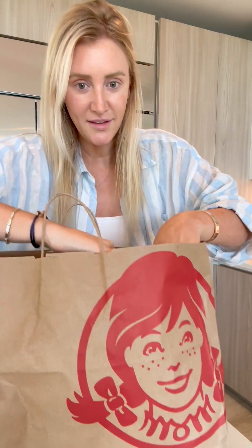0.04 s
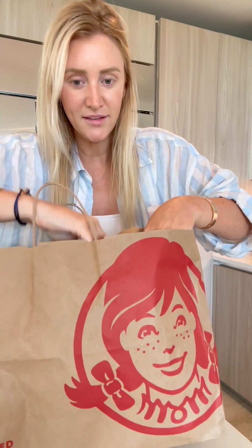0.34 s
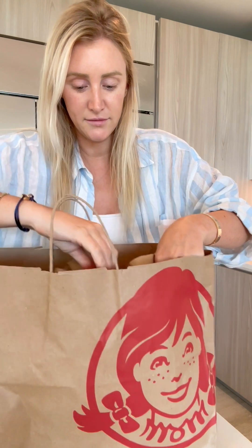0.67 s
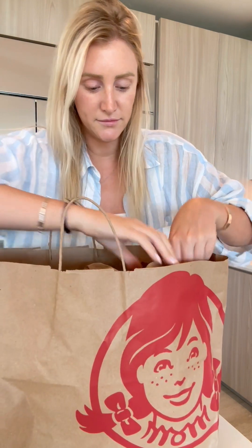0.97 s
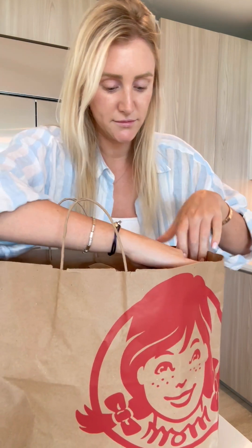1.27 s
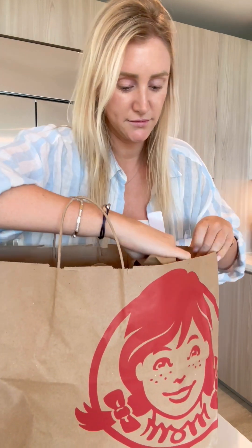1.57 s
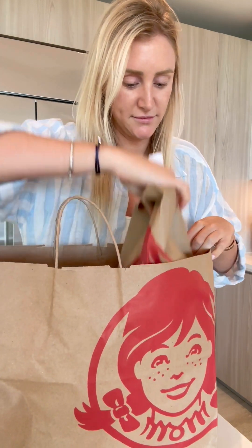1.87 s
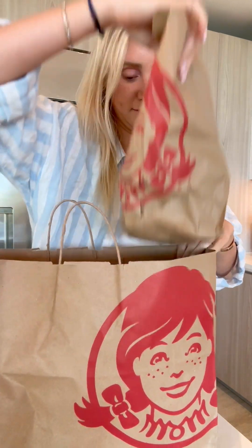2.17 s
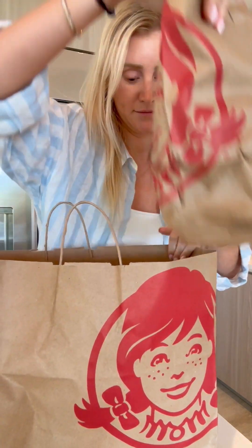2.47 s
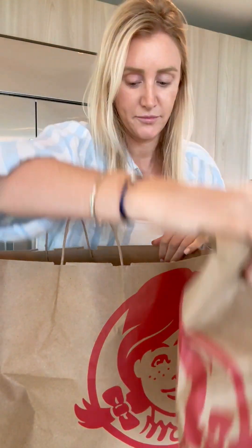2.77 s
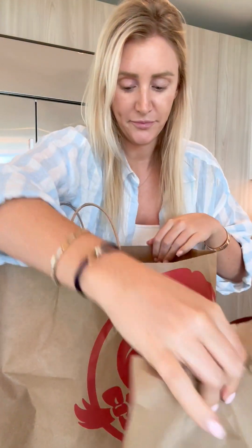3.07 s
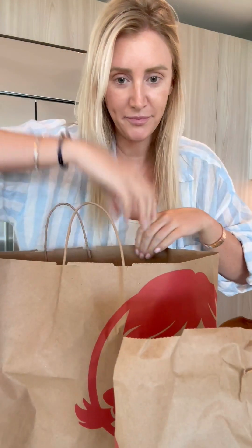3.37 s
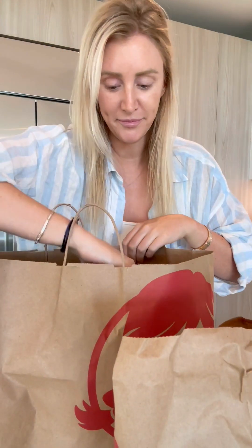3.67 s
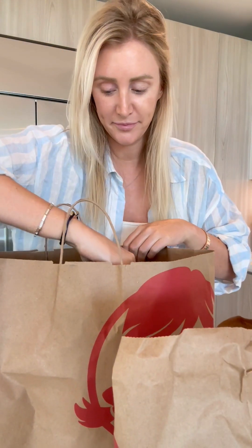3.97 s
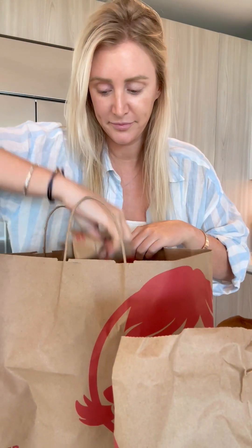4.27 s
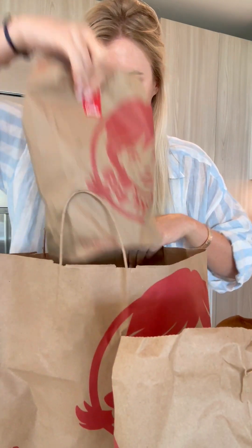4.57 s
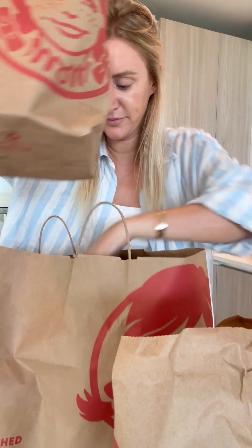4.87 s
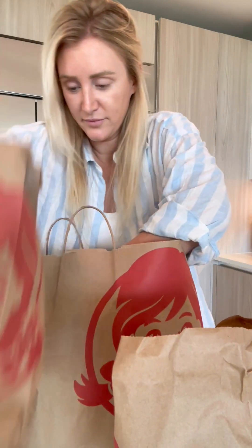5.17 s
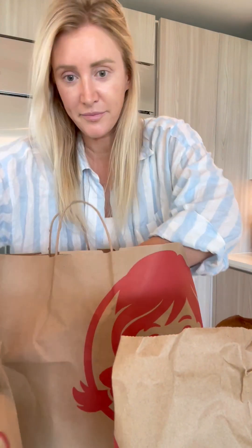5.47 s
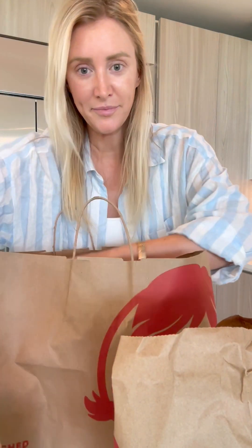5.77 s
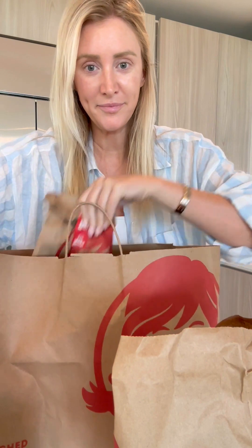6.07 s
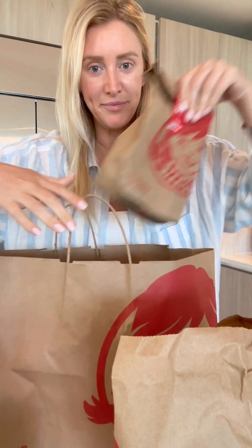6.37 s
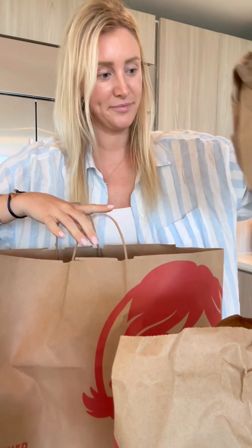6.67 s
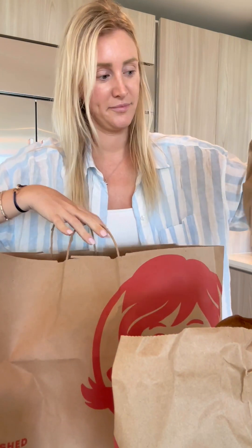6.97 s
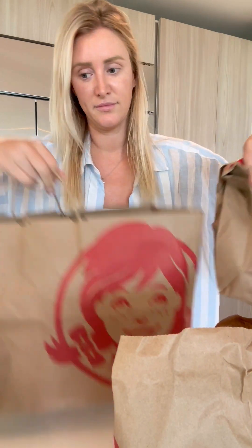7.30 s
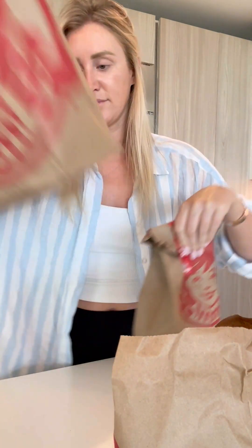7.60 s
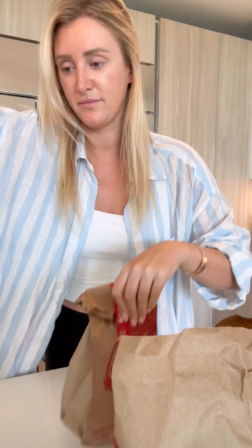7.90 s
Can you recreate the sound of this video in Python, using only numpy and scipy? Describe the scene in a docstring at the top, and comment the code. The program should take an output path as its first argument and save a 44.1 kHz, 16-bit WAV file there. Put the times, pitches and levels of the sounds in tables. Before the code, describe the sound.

Close, crisp paper rustling starts at once as hands rummage in a large paper bag, with sharp crease snaps and hollow pops from its stiff sides. The crinkling grows thicker from about 1.3 to 2.2 seconds, then loosens into separate crackles. A full bag lands on the counter with a soft thump near 2.9 seconds, amid more crunching. After a brief lull, rummaging resumes at 3.6 seconds, and the panels pop and flap from about 4 to 5 seconds. Dull thuds come near 5.1 and 5.5 seconds, followed by more crinkling and sharp snaps at 6 and 6.3 seconds. The paper quietens, then gives a cluster of hollow flaps and soft bumps around 7 seconds as the large bag is moved aside. Faint rustles and one small crackle near 8 seconds finish. A low ventilation hum and the short reflections of a small kitchen lie underneath.

```python
"""A small kitchen: hands rummage in a large paper carrier bag on the counter, lift out three small bags
and put the carrier aside. Paper sliding on paper hisses and crinkles, creases snap, stiff panels buckle
with hollow pops or slow flaps, and full bags thump down. The walls answer over a low ventilation hum,
and the paper is heard from nearby, with a wide stereo treble."""
import sys
import numpy as np
from scipy import signal
from scipy.fft import rfft, irfft, next_fast_len
from scipy.io import wavfile
from scipy.ndimage import uniform_filter1d, map_coordinates

SR = 44100
rng = np.random.default_rng(int(sys.argv[2]) if len(sys.argv) > 2 else 0)


def waveform_to_disk(signal):
    """Save audio, clipped to [-1, 1], as 16-bit WAV at the path in sys.argv[1]."""
    frames = np.transpose(np.atleast_2d(signal))
    scaled = np.clip(frames, -1, 1) * 32767
    samples = np.round(scaled).astype(np.int16)
    wavfile.write(sys.argv[1], SR, samples)


N = 358974
SCATTER_DB = 6.5  # level spread of the lesser snaps and pops, either way


def handling():
    """How hard the hands work the paper: dB curves that drive panel flutter, crinkle and hiss."""
    # strokes of paper on paper, with flutter and hiss relative to the crinkle:
    # start_s, length_s, crinkle_db, swell_db, flutter_db, hiss_db
    strokes = [ (-0.02, 0.063, -33.5, 1, 2, -7.5), (0.089, 0.31, -39.5, -14, 0, -8),
               (0.314, 0.058, -31, 5, -2.5, -4), (0.365, 0.038, -26.5, 1.5, -2.5, -7),
               (0.499, 0.32, -35, -2, 2, -8), (0.885, 0.12, -47.5, 2.5, -1.5, -3),
               (1.028, 0.1, -45, 1, -1, -2), (1.123, 0.25, -41, -2, 0.5, -7),
               (1.309, 0.24, -33.5, 5.5, 0, -8.5), (1.595, 0.22, -32.5, 10, -3.5, -5),
               (1.8, 0.18, -30.5, 4, -1.5, -2.5), (1.937, 0.16, -29.5, 1, -3.5, -3),
               (2.118, 0.048, -32.5, 2, 3.5, -9.5), (2.24, 0.36, -50, -16.5, 2, -8.5),
               (2.486, 0.055, -48, -5, 7, -11.5), (2.603, 0.14, -48, -10.5, -1, -24),
               (2.906, 0.046, -34.5, 1, 1.5, -7.5), (2.964, 0.055, -35, 6.5, 0, -9),
               (3.057, 0.096, -31.5, -4, -1.5, -6.5), (3.226, 0.16, -58, 3.5, -6, -8),
               (3.602, 0.23, -41, -6, -1, -5), (3.865, 0.4, -39.5, 1, 1, -5.5),
               (4.35, 0.33, -44, -0.5, -5, 1), (4.44, 0.012, -34.5, 3, 1.5, -1),
               (4.637, 0.22, -44, -5.5, 5, -9.5), (4.92, 0.14, -48.5, 4.5, 10, -13.5),
               (5.075, 0.34, -46.5, 5.5, 2.5, -9), (5.451, 0.26, -41, -11, 1, -9.5),
               (5.673, 0.07, -37, 10, -2, -7.5), (5.803, 0.14, -45.5, -5.5, 2, -5.5),
               (5.983, 0.045, -47, -6, 7, 1.5), (6.12, 0.19, -48, 1, -0.5, -0.5),
               (6.4, 0.23, -64, -15, -1, -12), (6.573, 0.19, -65.5, -1.5, -3, -4.5),
               (6.958, 0.1, -49.5, -7, 11.5, -20.5), (7.06, 0.15, -52.5, 11, 3.5, -11.5),
               (7.28, 0.23, -56, -18, -4, -40), (7.475, 0.11, -59.5, 4, 3.5, -7.5),
               (7.798, 0.13, -66, 3.5, 1, -13), (7.981, 0.012, -43, 1.5, 2, -10.5),
               (8.1, 0.05, -57.5, 3, 8, -5.5)]
    # paper barely stirring between strokes: flutter_db, crinkle_db, hiss_db
    rest_db = [-62.5, -70.5, -88]
    attack_s, release_t60_s = 0.021, 0.33  # a stroke takes hold quickly; the paper settles after it
    power = np.zeros((3, N))
    for start, length, crinkle_db, swell_db, flutter_db, hiss_db in strokes:
        span = np.arange(max(0, int(start * SR)), min(N, int((start + length + release_t60_s) * SR)))
        t = span / SR - start
        hold = amp(crinkle_db + swell_db * (np.minimum(t / length, 1) - .5))
        release = amp(-60 * np.maximum(t - length, 0) / release_t60_s)
        envelope = np.clip(t / attack_s, 0, 1) * hold * release
        power[:, span] += (amp([[flutter_db], [0], [hiss_db]]) * envelope) ** 2
    return 10 * np.log10(power + amp(rest_db)[:, None] ** 2)


def rustle(levels):
    """Paper slides on paper: the same slips make panels flutter, wrinkles crinkle and fibres hiss."""
    # boxy tone of the panels: freq_hz, gain_db
    panel_eq = [(25, -33.5), (60, 10), (130, 4.5), (215, 2.5), (285, 4.5), (370, -1), (600, 1), (1000, -3),
                (1500, -6), (2200, -20.5), (4000, -76)]
    # midrange bite of the wrinkles: freq_hz, gain_db
    crinkle_eq = [(300, -43), (900, 2.5), (1500, 1.5), (2000, 5.5), (2300, 1), (2600, 3), (3100, -1.5),
                  (3800, 0.5), (4700, -9), (5900, -6), (7000, -19), (9000, -34), (15000, -57.5)]
    # airy top of the fibres: freq_hz, gain_db
    hiss_eq = [(2500, -34.5), (5000, 1.5), (7400, 3), (10000, -1.5), (12300, -2), (15500, -1.5)]
    panel_db, crinkle_db, hiss_db = levels
    grip_db = 1.46 * wobble(55)  # the sheets catch and let go
    slips = unit(crackle(per_s=570, spread_db=0, t60_s=.082, smooth=.84))
    ticks = amp(-7.5) * unit(crackle(per_s=130, spread_db=3, t60_s=.012))
    prickles = amp(-3) * unit(crackle(per_s=110, spread_db=3.2, t60_s=.006))
    facets = unit(flutter(per_s=420, pitch_hz=665, scatter=.586, cycles=14.7, spread_db=6.5))
    creases = unit(flutter(per_s=350, pitch_hz=2550, scatter=.482, cycles=13, spread_db=29))
    crunch = slips + ticks + .5 * prickles + .15 * creases
    panels = amp(panel_db + grip_db) * unit(coloured(facets + .81 * slips, panel_eq))
    wrinkles = amp(crinkle_db + grip_db) * unit(coloured(crunch, crinkle_eq))
    fibres = amp(hiss_db + grip_db + 3) * unit(coloured(slips + ticks + prickles, hiss_eq))
    return crumple(panels + wrinkles + fibres, depth_db=2.17)


def crackle(per_s, spread_db, t60_s, smooth=0):
    """Tiny random slips, each a short burst of noise, over a smooth share of sliding."""
    when, strength = rng.random((int(per_s * N / SR), 2)).T
    sizes = amp(spread_db * np.minimum(-np.log(1 - strength), 4))
    slips = np.bincount((when * N).astype(int), sizes ** 2, N)
    decay = amp(-60 / (t60_s * SR)) ** 2
    power = signal.lfilter([1], [1, -decay], slips)
    return np.sqrt(power / power.mean() + smooth) * rng.standard_normal(N)


def flutter(per_s, pitch_hz, scatter, cycles, spread_db, size=900):
    """Many small facets flip over, each ringing for a few cycles at its own pitch."""
    when, strength = np.hsplit(rng.random((int(per_s * N / SR), 2)), 2)
    hz = pitch_hz * np.exp(scatter * rng.standard_normal(when.shape))
    turns = hz * np.arange(size) / SR
    grains = amp(spread_db * strength - 60 * turns / cycles) * np.sqrt(hz) * np.sin(2 * np.pi * turns)
    where = (when * N).astype(int) + np.arange(size)
    return np.bincount(where.ravel(), grains.ravel(), N)[:N]


def crumple(x, depth_db, size=512):
    """The crumpled sheet keeps changing shape, so short-lived resonances come and go."""
    spectrum = signal.stft(x, nperseg=size)[2]
    patches = uniform_filter1d(rng.standard_normal(spectrum.shape), size=3, axis=0)
    patches = uniform_filter1d(patches, size=5, axis=1)
    return signal.istft(spectrum * amp(depth_db * unit(patches)), nperseg=size)[1][:len(x)]


def snaps(levels):
    """Creases snap through, each with its own balance of hollow body, crack and bright edge."""
    # the loudest creases, with body and edge relative to the crack: start_s, level_db, body_db, edge_db
    accents = [(0.032, -30.5, -3, -2.5), (0.098, -36, 5, -13), (0.104, -24.5, -1, -5),
               (0.108, -24, -15, -4.5), (0.114, -32.5, 4, 0), (0.295, -37, -1, -10.5),
               (0.391, -25.5, 2.5, -10), (0.399, -27, 0.5, -12), (0.411, -36, 4, -11.5),
               (0.546, -27.5, -4, -6.5), (0.602, -35.5, -8, -8), (0.715, -28.5, -5, -15),
               (0.753, -29.5, -3, -5), (0.783, -30.5, 1.5, -4.5), (0.789, -32, -1, -3),
               (0.853, -33, -2, -13.5), (0.921, -33.5, -5, -4), (0.964, -32.5, -1.5, -10),
               (0.974, -39, -12, -10), (1.055, -42, 0, -5), (1.067, -41.5, -4, -2), (1.152, -33, -16, -14),
               (1.212, -30, 0.5, -15.5), (1.217, -28, 4, -0.5), (1.24, -30.5, -4, -9),
               (1.284, -33, -8, -11.5), (1.323, -34.5, 2, -4), (1.335, -30.5, 0.5, -5),
               (1.424, -26.5, -5, -8.5), (1.427, -36, 0.5, -10), (1.476, -30.5, 1, -2.5),
               (1.514, -31, -0.5, -11), (1.525, -35, -8, -4.5), (1.544, -38.5, -4, -7),
               (1.636, -38.5, 7.5, -19.5), (1.66, -23.5, -6, -9.5), (1.938, -24, -0.5, -9.5),
               (1.955, -24.5, -2, -3.5), (1.964, -30.5, 2.5, -10.5), (2.01, -26, 2, -14),
               (2.058, -23.5, -20, -10.5), (2.096, -24.5, -11, -7.5), (2.129, -35.5, 4, -14.5),
               (2.175, -29.5, -3, -2), (2.198, -37.5, -6, 1.5), (2.234, -25.5, -4.5, 0),
               (2.28, -30, -2, -2.5), (2.34, -30.5, -6, -26), (2.46, -38.5, -4.5, -11.5),
               (2.48, -47.5, 3, -7), (2.502, -43.5, 6, -13), (2.529, -41.5, 4.5, -2),
               (2.613, -27, -10.5, -10), (2.637, -40, 2.5, -11), (2.675, -24.5, 1, -1),
               (2.677, -27.5, -5, 0.5), (2.71, -38, 1, -13), (2.724, -38.5, 4, -17.5),
               (2.734, -27.5, -3, -7), (2.821, -29.5, -4.5, -15), (2.887, -43, 2, -12),
               (2.916, -38, 3, -14), (2.924, -33, 2.5, -9), (2.931, -26, -9, -8.5), (2.974, -39.5, -6, -15),
               (3.003, -27.5, -1, -10.5), (3.014, -25.5, -4, -10), (3.083, -20.5, -4.5, -9),
               (3.112, -30.5, 0.5, -3.5), (3.135, -26.5, -11, -13.5), (3.156, -24, -7, -1),
               (3.184, -33, -11, -5.5), (3.608, -36, -3.5, -5.5), (3.618, -34, -2, -1.5),
               (3.651, -31.5, -5, -20), (3.723, -34, -5, -4.5), (3.76, -34, -1, -1),
               (3.808, -28.5, -27, -8), (3.815, -29.5, -1.5, -8), (3.889, -31.5, -2, -4),
               (3.909, -34.5, -5.5, -10.5), (3.965, -30, -1.5, 3.5), (4.003, -34, 1, -3),
               (4.011, -37, 0, -11), (4.078, -35.5, 2.5, -21), (4.107, -24.5, 0, -17),
               (4.28, -38, 8.5, -18), (4.348, -39, -4, -0.5), (4.382, -26, -25, -7),
               (4.478, -35, -12, -0.5), (4.602, -24, -6, -5), (4.661, -34, -7, -13), (4.725, -38, 7, -26),
               (4.743, -39, 6, -19.5), (4.803, -49, 11, -17), (4.869, -40.5, -3, -12),
               (4.941, -42.5, 4, -24), (5, -39.5, -14, -3), (5.024, -46, 2, -25), (5.04, -47, 11, -18),
               (5.066, -43.5, 8, -17), (5.117, -45.5, 5, -11), (5.134, -46, -1, -7), (5.173, -36, -2, -21),
               (5.222, -40, 5, -13), (5.311, -30, -1.5, -5.5), (5.318, -35, 1, -7.5), (5.357, -50, 12, 2),
               (5.391, -38.5, 2, -9), (5.457, -35, 0, -0.5), (5.506, -38, -1, -4.5),
               (5.578, -31, -0.5, -9.5), (5.586, -37, 3.5, -3.5), (5.642, -42.5, -10, 0),
               (5.684, -28.5, -3.5, -4.5), (5.692, -26.5, -4, 2), (5.729, -34.5, -8, 4),
               (5.761, -32, -0.5, -10), (5.791, -50, 0, 2.5), (5.817, -32, -4, 0.5),
               (5.822, -30.5, -11, -5.5), (5.853, -33.5, -18, -11.5), (5.934, -44, 1, -6),
               (5.971, -46.5, -7, -13), (6, -25.5, -5.5, -7), (6.03, -44.5, 4, -9), (6.1, -32, -3.5, -1.5),
               (6.14, -43, 7, 2.5), (6.249, -36.5, 5.5, -10), (6.295, -23, -4, -1.5),
               (6.354, -43.5, 1, -2.5), (6.358, -38.5, -3, -3.5), (6.415, -43.5, -7, -20),
               (6.492, -55, 12, -29), (6.591, -42.5, -8, -6.5), (6.759, -55, -16, -1.5),
               (6.972, -40, 1.5, -36), (6.991, -39, 2, -36), (7.022, -36.5, 4, -24),
               (7.182, -42.5, -8, -4.5), (7.199, -32.5, 3.5, -32), (7.297, -44, 16.5, -30),
               (7.699, -54.5, 5.5, -15), (8.008, -40, 1, -19)]
    # hollow body: freq_hz, gain_db
    body_eq = [(150, -18.5), (500, -5), (1000, 3), (1700, 6.5), (2400, -8.5), (5000, -56)]
    # midrange crack: freq_hz, gain_db
    crack_eq = [(700, -29), (1600, 2), (2100, 4.5), (3800, 1.5), (4800, -2), (6000, 0), (7500, -12),
                (11000, -61)]
    # bright edge: freq_hz, gain_db
    edge_eq = [(3500, -45), (6000, 3.5), (7500, 12.5), (10000, 0.5), (12300, -1.5), (15500, 3.5)]
    out, t = np.zeros(N), np.arange(SR // 10) / SR
    lesser = [(start, crinkle - 3.5 + scatter, -1 + SCATTER_DB * draw, hiss - crinkle)
              for start, _, crinkle, hiss, scatter, draw in chance_moments(levels, per_s=12)]
    for start, level_db, body_db, edge_db in accents + lesser:
        burst = snap_burst(t, rise_s=.0012, ring_db=-14, ring_t60_s=.045, ripple_db=2.1)
        tick = snap_burst(t, rise_s=.0009, ring_db=-19, ring_t60_s=.05, ripple_db=2.5)
        body = amp(body_db) * held(coloured(burst, body_eq), .0065)
        crack = held(coloured(burst, crack_eq), .0058)
        edge = amp(edge_db) * held(coloured(tick, edge_eq), .017)
        add(out, start, amp(level_db) * (body + crack + edge))
    return out


def snap_burst(t, rise_s, ring_db, ring_t60_s, ripple_db, count=40):
    """A crease gives way in milliseconds; the sheet shivers on, with resonances set by its folds."""
    envelope = t / rise_s * np.exp(1 - t / rise_s) + amp(ring_db - 60 * t / ring_t60_s)
    folds = np.column_stack([np.geomspace(600, 15000, count), ripple_db * rng.standard_normal(count)])
    return coloured(envelope * rng.standard_normal(len(t)), folds)


def buckles(levels, count=14):
    """A panel pops through and rings in a cluster of modes round its pitch, with a scuff of noise."""
    # the loudest panels buckling or being bumped: start_s, level_db, pitch_hz
    accents = [(0.105, -26, 520), (0.397, -24, 760), (0.544, -34.5, 790), (0.554, -23.5, 683),
               (0.697, -31, 620), (1.424, -34, 584), (1.509, -28.5, 518), (2.165, -30, 597),
               (1.99, -31, 290), (2.175, -29.5, 263), (2.315, -28, 484), (2.734, -31, 630),
               (2.822, -44.5, 480), (3.622, -35.5, 620), (4.107, -23.5, 673), (4.282, -24, 640),
               (4.381, -21, 673), (4.384, -27.5, 274), (4.664, -30, 402), (4.725, -24.5, 897),
               (4.741, -30, 834), (4.873, -29.5, 474), (4.954, -31.5, 713), (4.987, -31, 520),
               (5.025, -28.5, 505), (5.24, -30.5, 480), (5.476, -27, 530), (5.816, -30.5, 484),
               (5.847, -30.5, 442), (6.001, -41, 626), (6.028, -31.5, 423), (6.255, -40, 735),
               (6.297, -41, 684), (6.362, -34.5, 406), (7.023, -28, 600), (7.031, -29, 553),
               (7.147, -37, 635), (7.199, -25, 570), (7.213, -33.5, 600), (7.298, -28.5, 680),
               (7.305, -25.5, 600), (7.512, -42.5, 544), (8.012, -37, 514)]
    typical_hz, spread_octaves, ring_cycles = 600, .39, 26
    out, t = np.zeros(N), np.arange(SR // 6) / SR
    lesser = [(start, panel - 7.5 + scatter, typical_hz * 2 ** (spread_octaves * draw))
              for start, panel, _, _, scatter, draw in chance_moments(levels, per_s=5)]
    for start, level_db, hz in accents + lesser:
        modes_hz = hz * np.exp(np.linspace(-.8, .85, count) + .078 * rng.standard_normal(count))
        lag_cycles = rng.uniform(0, 2.305, (count, 1))  # slow, low bending waves tend to arrive last
        turns = np.maximum(modes_hz[:, None] * t - lag_cycles, 0)
        strength = np.hanning(count + 2)[1:-1] * rng.choice([-1, 1], count)
        ring = strength @ (np.sin(2 * np.pi * turns) * amp(-60 * turns / ring_cycles))
        push = (1 - np.exp(-t / .00095)) * amp(-60 * t / .058) * rng.standard_normal(len(t))
        scuff = coloured(push, [(hz / 7, -16), (hz / 2.1, -2), (hz * .85, -1),
                                (hz * 4.3, -7), (hz * 6, -22), (hz * 16, -48)])
        add(out, start, amp(level_db) * (held(ring, .0036) + held(scuff, .0037)))
    return out


def flaps(count=13):
    """A panel flaps through slowly: its boxy modes swell and die, falling in pitch as it slackens."""
    # slow panel flaps: start_s, length_s, level_db, first_pitch_hz
    cues = [(0.527, 0.047, -33.5, 785), (0.677, 0.035, -37, 621), (0.735, 0.034, -33, 760),
            (4.686, 0.03, -33.5, 688), (4.741, 0.027, -34.5, 600), (4.796, 0.016, -41, 726),
            (4.962, 0.021, -33.5, 804), (5.041, 0.042, -33.5, 642), (5.927, 0.037, -36.5, 875),
            (6.933, 0.029, -49, 706), (6.991, 0.02, -37, 500), (7.074, 0.037, -38, 722),
            (7.15, 0.028, -43.5, 726), (7.208, 0.018, -29.5, 700), (6.552, 0.028, -50.5, 680)]
    fall_octaves, mode_spacing = .83, .14
    out = np.zeros(N)
    for start, length, level_db, hz in cues:
        progress = np.linspace(0, 1, int(length * SR))
        turns = np.cumsum(hz * 2 ** (-fall_octaves * progress)) / SR
        steps = np.arange(count) - count // 2 + .42 * rng.standard_normal(count)
        ratios = np.exp(mode_spacing * steps)[:, None]
        modes = np.sin(2 * np.pi * (ratios * turns + rng.random((count, 1))))
        ring = np.hanning(count + 2)[1:-1] @ modes
        add(out, start, amp(level_db) * unit(ring * np.sin(np.pi * progress)))
    return out


def taut_folds(attack_s=.00041):
    """A fold pulled taut sounds one short papery note."""
    # creases that ring as they snap: start_s, level_db, pitch_hz, t60_s
    cues = [(0.104, -14, 1720, .025), (0.107, -13, 4020, 0.014), (1.423, -17, 1920, 0.031),
            (2.676, -19, 6100, 0.023), (3.083, -9.5, 3380, 0.017), (3.156, -18, 2040, 0.028),
            (6.0, -13.5, 4100, 0.013), (6, -28, 3300, .014), (6.295, -15, 2200, 0.017),
            (6.294, -14, 5940, 0.017)]
    out, t = np.zeros(N), np.arange(SR // 16) / SR
    for start, level_db, hz, t60 in cues:
        envelope = amp(level_db - 60 * t / t60) * (1 - np.exp(-t / attack_s))
        add(out, start, envelope * np.sin(2 * np.pi * hz * t))
    return out


def thumps(boost_db=2.5):
    """A soft weight lands: a few low cycles that die at once."""
    # bags and their contents landing: start_s, level_db (before the boost), pitch_hz, t60_s
    landings = [(2.924, -13, 155, 0.035), (2.993, -20, 123, 0.054), (5.059, -18.5, 94, 0.096),
                (5.494, -24, 70.3, 0.074), (6.977, -22.5, 124, 0.049), (7.087, -28.5, 116, 0.1),
                (7.206, -34, 130, 0.06)]
    out, t = np.zeros(N), np.arange(SR // 4) / SR
    contact = (1 - np.exp(-t / .0019)) ** 2
    for start, level_db, hz, t60 in landings:
        envelope = amp(level_db + boost_db - 60 * t / t60) * contact
        add(out, start, envelope * np.sin(2 * np.pi * hz * t))
    return out


def kitchen(x, predelay_s, count=6):
    """Cupboards and walls answer; a different tail every quarter second suggests the bags moving."""
    # the room's decay: freq_hz, t60_s
    decay = [(150, 0.31), (1000, 0.39), (3500, 0.45), (8000, 0.095), (15000, 0.31)]
    # stereo width of the reflections, side relative to mid: freq_hz, side_db
    width = [(60, -29.5), (300, -14), (700, -13), (1300, -0.5), (2200, -5.5), (4500, -2.5), (8000, -14),
             (14000, -17.5)]
    wet, quarter = np.zeros((2, N)), np.arange(N) * 4 // SR
    for k in range(count):
        hz, t, noise = signal.stft(rng.standard_normal((2, SR // 2)), SR, nperseg=256)
        tail = signal.istft(noise * amp(-60 * t / along(decay, hz)[:, None]), SR, nperseg=256)[1]
        tail = np.pad(tail / np.linalg.norm(tail[0]), ((0, 0), (int(predelay_s * SR), 0)))
        send = x * (quarter % count == k)
        wet += signal.fftconvolve(send[None], tail, axes=1)[:, :N]
    side = filtered(wet[1], lambda hz: amp(along(width, hz)))
    return np.array([wet[0] + side, wet[0] - side])


def ventilation(motor_hz=128.2, waver_hz=1.106):
    """A fan: a low rush of air and the slightly wavering tone of its motor."""
    # the rush of air: freq_hz, gain_db
    air_eq = [(20, -32), (40, -12), (62, 0), (95, 1.5), (112, -2.5), (150, 4), (190, -4), (280, -7.5),
              (400, -25.5), (800, -48.5), (2000, -36), (6000, -56), (15000, -52)]
    turns = np.cumsum(motor_hz + waver_hz * wobble(6)) / SR
    motor = unit(np.sin(2 * np.pi * turns) * amp(2.1 * wobble(3.26)))
    air = unit(coloured(rng.standard_normal(N), air_eq))
    return amp(-44) * air + amp(-51.5) * motor


def chance_moments(levels, per_s):
    """Random moments when paper gives way: start_s, the three levels then, scatter_db, a draw in -1..1."""
    when, scatter, draw = rng.random((int(per_s * N / SR), 3)).T
    at = (when * N).astype(int)
    return zip(at / SR, *levels[:, at], SCATTER_DB * (2 * scatter - 1), 2 * draw - 1)


def amp(db):
    """Decibels to gain."""
    return 10 ** (np.asarray(db) / 20)


def unit(x):
    """Scaled to rms 1."""
    return x / np.sqrt(np.mean(x ** 2) + 1e-20)


def held(x, seconds):
    """A burst scaled to the energy of rms 1 held for the given time."""
    return x * np.sqrt(seconds * SR / np.sum(x ** 2))


def along(points, hz):
    """(freq_hz, value) points read on a log axis."""
    freqs, values = np.transpose(points)
    return np.interp(np.log(hz + 1), np.log(freqs + 1), values)


def wobble(per_s):
    """A smooth random curve with per_s knots a second."""
    knots = rng.standard_normal(int(N * per_s / SR) + 4)
    return map_coordinates(knots, [np.arange(N) * per_s / SR])


def filtered(x, response):
    """x times a complex response of frequency."""
    size = next_fast_len(N + SR // 4)
    return irfft(rfft(x, size) * response(np.fft.rfftfreq(size, 1 / SR)), size)[..., :N]


def coloured(x, eq, size=4096):
    """x through a minimum-phase EQ of (freq_hz, gain_db) points, which keeps attacks sharp."""
    cepstrum = irfft(np.log(amp(along(eq, np.fft.rfftfreq(size, 1 / SR)))))
    cepstrum[1:size // 2] *= 2
    cepstrum[size // 2 + 1:] = 0
    return signal.fftconvolve(x, irfft(np.exp(rfft(cepstrum))))[:len(x)]


def add(track, start_s, x):
    """Mix x into the track at start_s."""
    span = track[max(0, round(start_s * SR)):][:len(x)]
    span += x[:len(span)]


def scene():
    """Paper up close with the room around it; broad sheets sound a little different left and right."""
    # stereo width of the sliding sheets: freq_hz, side_db
    sheet_width = [(60, -40), (300, -23), (1300, -11.5), (2100, -21), (2600, -10), (4000, -15.5),
                   (4500, -1), (5300, -9.5), (6200, -9), (7000, -20.5), (7800, -42.5), (8800, -4),
                   (10600, -19), (11700, -27), (12800, -6), (14100, -6.5), (15000, -29.5)]
    levels = handling()
    sliding = rustle(levels)
    pops = snaps(levels) + buckles(levels) + flaps()
    notes = taut_folds()
    direct = amp(-.6) * sliding + pops + notes + thumps()
    side = filtered(rustle(levels), lambda hz: amp(along(sheet_width, hz)))
    room_send = amp(-12.5) * sliding + amp(-11) * pops + amp(-22) * notes
    return direct + np.array([side, -side]) + kitchen(room_send, predelay_s=.004) + ventilation()


def record(dry):
    """A left-right phase shift growing through the treble widens it; the mids lean left and both ends roll off."""
    # left-right phase shift, growing with frequency, that widens the treble: freq_hz, shift_rad
    phase_shift = [(20, 0), (4100, 0), (5200, 1.3), (6100, 1.75), (7600, 3.14), (8300, 3.3), (9600, 4.65),
                   (11200, 6.2), (12400, 6.5), (14800, 9.3)]
    # left over right: freq_hz, gain_db
    balance = [(100, 0.2), (300, 1.4), (1300, 2.05), (2000, 0), (15000, 0)]
    # tone of both channels: freq_hz, gain_db
    colour = [(15, -16.5), (28, -5), (42, 0), (4000, -.5), (6300, -2), (7500, -2),
              (10000, -.5), (15000, -8.5)]
    sides, top_hz = np.array([[.5], [-.5]]), 15750

    def response(hz):
        gain = amp(along(colour, hz) + sides * along(balance, hz)) * (hz < top_hz)
        return gain * np.exp(1j * sides * along(phase_shift, hz))

    return filtered(dry, response)


dry = scene()
out = record(dry)
waveform_to_disk(out)
```